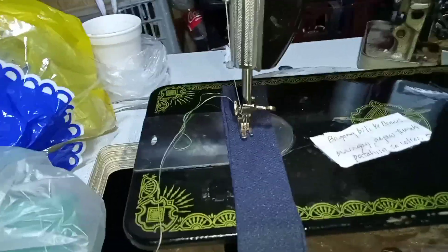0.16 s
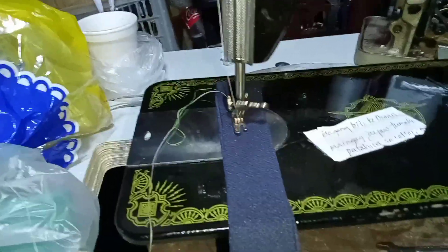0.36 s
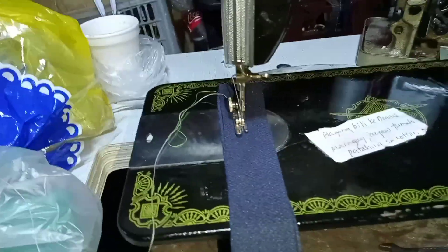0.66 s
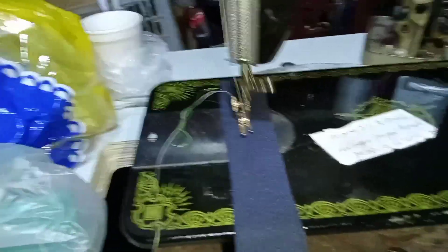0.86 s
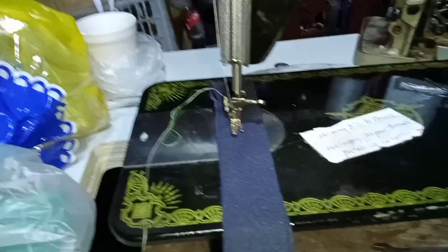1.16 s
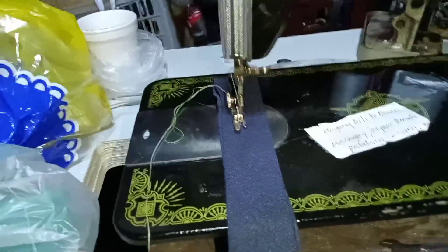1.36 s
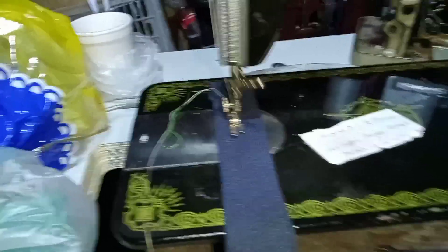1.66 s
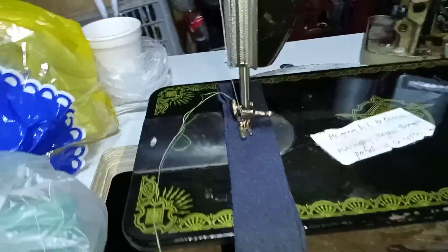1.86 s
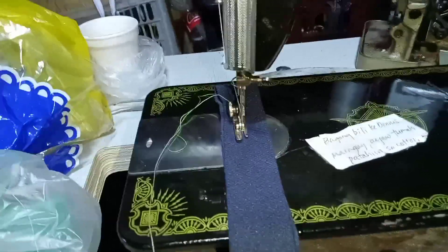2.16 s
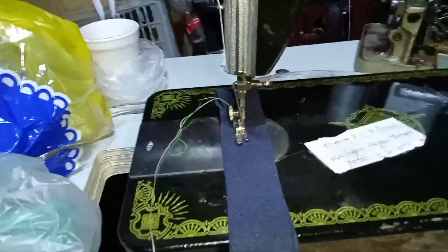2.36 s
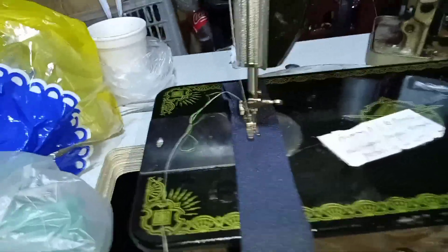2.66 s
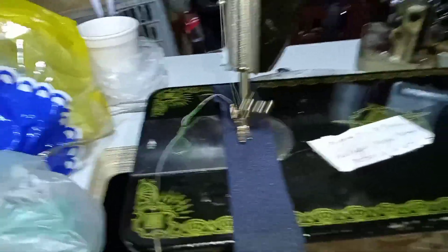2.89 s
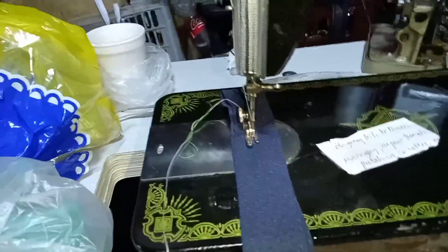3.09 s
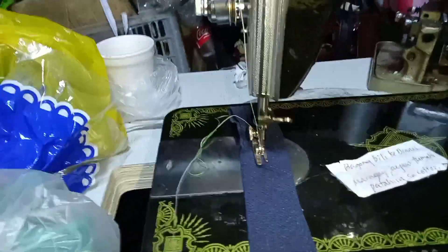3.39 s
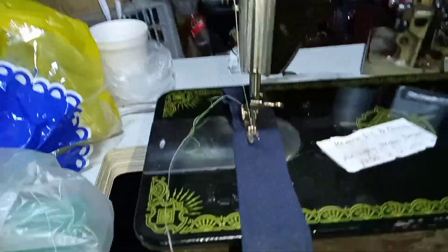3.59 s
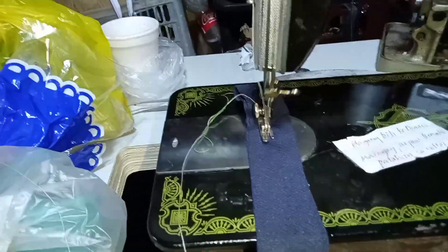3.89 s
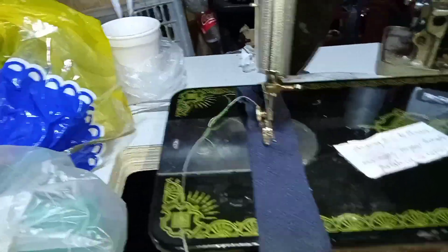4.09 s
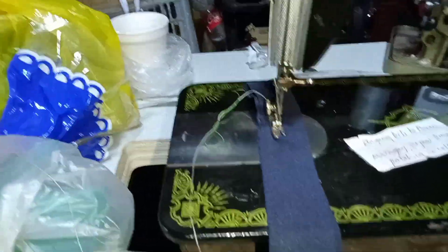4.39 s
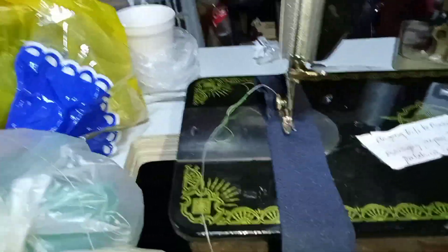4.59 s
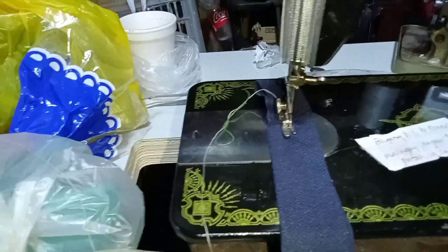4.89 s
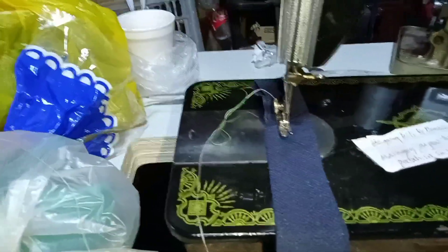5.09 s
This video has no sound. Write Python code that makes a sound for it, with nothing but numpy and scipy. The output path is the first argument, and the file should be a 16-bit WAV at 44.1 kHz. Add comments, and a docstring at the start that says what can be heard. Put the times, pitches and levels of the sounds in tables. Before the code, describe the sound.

Uneven clusters of steel clacks ring a hand-cranked sewing machine in a small workshop, with grating bearings, small rattles and low handling thumps.

```python
"""A cast-iron sewing machine in a small workshop, turned slowly and unevenly by hand, close to a hand-held microphone.
From the start low bumps and a lumpy rumble come from the grip; blows clack in clusters and ring frame, bed and steel.
Bearings rub and cloth hisses throughout; a spring ticks now and then, metal groans in the first three seconds and
a dry pivot squeaks early on. Late on the work drags on the table, and more bumps on the microphone close the scene.
Blows are noise bursts and damped modes; rubbing, rumble and room hush are coloured noise; bumps are short sine pulses."""
import sys
import numpy as np
from scipy import signal
from scipy.fft import rfft, irfft, next_fast_len
from scipy.io import wavfile
from scipy.ndimage import map_coordinates

SR = 44100
rng = np.random.default_rng(int(sys.argv[2]) if len(sys.argv) > 2 else 0)


def unload_audio(sound):
    """Save the sound as a 16-bit wav file, at the path given as the first command line argument."""
    columns = np.transpose(np.atleast_2d(sound))
    # keep every value between -1 and 1, then stretch to whole-number steps
    steps = np.round(np.clip(columns, -1, 1) * 32767)
    wavfile.write(sys.argv[1], SR, steps.astype(np.int16))


N = 231260  # samples


def amp(db):
    """Decibels to gain."""
    return 10 ** (np.asarray(db) / 20)


def unit(x):
    """Scale to rms 1."""
    return x / np.sqrt(np.mean(x ** 2) + 1e-20)


def punch(x):
    """Scale a hit so that its first 10 ms carry rms 1."""
    return x / np.sqrt(np.mean(x[:SR // 100] ** 2) + 1e-20)


def along(points, hz):
    """Read (Hz, value) points on a log frequency axis."""
    f, v = np.transpose(points)
    return np.interp(np.log(hz + 1), np.log(f + 1), v)


def curves(rows):
    """One value per sample for each column after the time."""
    s, *columns = np.transpose(rows)
    return [np.interp(np.arange(N) / SR, s, column) for column in columns]


def wobble(rate):
    """A smooth random curve, rate knots a second."""
    knots = rng.standard_normal(int(N * rate / SR) + 4)
    return map_coordinates(knots, [np.arange(N) * rate / SR])


def swells(rows):
    """A gain that rises and falls around each crest; overlapping swells add in power."""
    power = np.zeros(N + SR)
    for s, half, db in rows:
        first = max(int((s - 3 * half) * SR), 0)
        near = np.arange(first, int((s + 3 * half) * SR))
        gain = amp(db) * np.exp(-((near / SR - s) / half) ** 2)
        power[near] += gain ** 2
    return np.sqrt(power[:N])


def add(track, s, sound):
    """Mix a sound into a track at time s."""
    start = max(round(s * SR), 0)
    track[start:start + len(sound)] += sound[:max(N - start, 0)]


def noise(spectrum):
    """Steady coloured noise of rms 1."""
    size = next_fast_len(N + 8192)
    gain = amp(along(spectrum, np.fft.rfftfreq(size, 1 / SR)))
    coloured = irfft(rfft(rng.standard_normal(size)) * gain, size)
    return unit(coloured[:N])


def body(spectrum, size=2048):
    """The causal (minimum-phase) impulse response of a body with this spectrum."""
    gain = amp(along(spectrum, np.fft.rfftfreq(size, 1 / SR)))
    cepstrum = irfft(np.log(gain))
    # folding the cepstrum forward in time makes the response causal
    cepstrum[1:size // 2] *= 2
    cepstrum[size // 2 + 1:] = 0
    return irfft(np.exp(rfft(cepstrum)))


def struck(spectrum, vary_db, dull_db=0):
    """The body as one blow finds it: each contact favours other resonances, and a soft one loses the very top."""
    hz, db = np.transpose(spectrum)
    top = np.interp(hz, [10000, 13000], [0, 1])
    varied_db = db + vary_db * rng.standard_normal(len(hz)) - dull_db * top
    return body(np.transpose([hz, varied_db]))


RING_T = np.arange(SR // 6) / SR  # time axis of one hit, s


def burst(response, attack, t60, tail_db, tail_t60):
    """A contact: noise with a first decay and a second one at its own level, through a body."""
    decay = amp(-60 * RING_T / t60) + amp(tail_db - 60 * RING_T / tail_t60)
    rattle = decay * (1 - np.exp(-RING_T / attack)) * rng.standard_normal(len(RING_T))
    return punch(signal.fftconvolve(rattle, response)[:len(RING_T)])


def ring(modes, attack, scatter_db, detune):
    """Damped modes; every blow excites and tunes them a little differently."""
    hz, db, t60 = np.transpose(modes)[:, :, None]
    level, shift, phase = rng.standard_normal((3, len(modes), 1))
    waves = np.sin(2 * np.pi * (hz * (1 + detune * shift) * RING_T + phase))
    decay = amp(db + scatter_db * level - 60 * RING_T / t60)
    return punch(np.sum(decay * waves, 0) * (1 - np.exp(-RING_T / attack)))


def glance(edge_db):
    """How glancing a blow is: 1 if dull, 0 if square and bright."""
    return np.interp(edge_db, [-23, -15], [1, 0])


# needle bar, shuttle and feed strike, a cluster for each push on the wheel:
# t/s, blow level/dB, bed knock level/dB re blow, bright edge level/dB re blow (all before the mix trims)
CLACKS = [(.0735, -16.5, -9, -23), (.092, -17, -5.5, -11), (0.1108, -13, -14, -20), (.244, -14, -37, -11.5),
          (0.4084, -21, -10, -14), (.4276, -19, -17, -15), (.4475, -8, -8, -19), (.4574, -9.5, -14, -19),
          (.4652, -18, -11, -7.5), (0.4821, -11, -9.5, -15), (0.5168, -4, -10, -17),
          (0.7876, -21.5, -12, -14), (0.8755, -11.5, -6.5, -25), (0.9576, -9.5, -17, -16.5),
          (.9834, -19, -13, -9.5), (1.0045, -21, 0.5, -13), (1.0336, -14.5, -2, -20),
          (1.222, -14, -12, -21), (1.254, -9.5, -14.5, -19.5), (1.3205, -12, -12.5, -15.5),
          (1.3633, -22.5, -12, -23), (1.381, -24, -30, -24), (1.616, -17.5, -15, -4.5),
          (1.6964, -18.5, -14.5, -20), (1.714, -10, -18.5, -30), (1.7388, -10, -11, -6.5),
          (1.7591, -8.5, -5, -6), (2.024, -12, -7.5, -19), (2.0505, -12.5, -23, -20),
          (2.0793, -10.5, -12, -20), (2.1098, -25, -9.5, -25), (2.139, -24.5, -25, -30),
          (2.2094, -19.5, -18, -18.5), (2.38, -20.5, -5, -27), (2.4459, -20, -31, -13),
          (2.4869, -17, -17, -19), (2.4951, -12.5, -8.5, -20.5), (2.588, -23, -31, -32),
          (2.614, -6, -24, -8), (2.621, -11.5, -19, -12), (2.7395, -16.5, -18, -19.5),
          (2.82, -6, -10, -6.5), (2.8509, -19, -11, -11), (2.8776, -4.5, -19, -16.5),
          (2.887, -11.5, -9, -30), (2.9123, -18.5, -5, -15), (2.917, -4.5, -14, -15),
          (3.2434, -14.5, -5, -9.5), (3.2972, -17, -31, -10), (3.3641, -12, -6, -33),
          (3.3816, -20.5, -8, -19), (3.5743, -13, -24, -13), (3.6461, -23, -4.5, -10),
          (4.0318, -26, -20, -35), (4.082, -18, -18, -41), (4.139, -17, -10.5, -12), (4.6143, -25, -8, -6),
          (4.716, -5, -15.5, -9.5), (4.7878, -10.5, -11, -7.5), (4.8791, -27, 3, -11),
          (5.038, -29, -18, -7)]
# resonances of the hollow bed, the loose steel and the thin needle plate: f/Hz, relative level/dB, t60/s
BED = [(401.5, -0.5, 0.11), (430.3, -2.5, 0.085), (374.7, -8.5, 0.065), (496, -11, 0.065)]
STEEL = [(1806, -12.5, 0.062), (1893, 2, 0.018), (2127, -11.5, 0.055), (2775, -7.5, 0.061),
         (3009, -6.5, 0.041), (3053, -8, 0.063), (3306, -1.5, 0.029), (3608, 1.5, 0.012)]
PLATE = [(5690, -25, 0.11), (7360, -7, 0.06), (8900, -14, 0.058), (9280, -4, 0.019), (10000, -5, 0.028),
         (10800, -18, 0.027)]
# colour of a steel contact and of its bright edge: f/Hz, relative level/dB
CRACK = [(600, -25), (1300, -6), (1850, -4.5), (2350, -1), (3200, -1.5), (3800, -9), (4300, -7),
         (4800, -23), (6000, -21.5), (10000, -75)]
EDGE = [(2500, -51), (4800, -3), (5800, -8), (6700, -2), (7400, -3.5), (8200, 1), (9600, 6), (11000, -7),
        (12300, -7), (13200, -14), (15500, -16)]
FRAME_DB, FRAME_GROWS = -17.5, 0.77  # heavy frame's answer to a 0 dB blow; dB per dB of the blow


def clacks():
    """Steel strikes steel and rings frame, bed and plate; glancing blows are dull, build slowly and graze first."""
    out, crack = np.zeros(N), body(CRACK)
    for s, db, bed_db, edge_db in CLACKS:
        glancing = glance(edge_db)
        rise = .0006 + .0008 * glancing  # s
        lead = rng.uniform(0.0055, 0.008)  # s, the graze starts before the blow
        graze = burst(crack, attack=0.0023, t60=0.055, tail_db=-20, tail_t60=.05)
        add(out, s - lead, glancing * amp(db - 27.5) * graze)

        rattle = burst(struck(CRACK, vary_db=5.0), attack=rise, t60=0.031, tail_db=7, tail_t60=0.05)
        clink = ring(STEEL, attack=rise, scatter_db=4, detune=.015)
        steel = amp(-16.5) * rattle + amp(-13.0) * clink
        bed = amp(-5.0) * ring(BED, attack=.003, scatter_db=2, detune=.022)
        edge = struck(EDGE, vary_db=5.0, dull_db=5 * glancing)
        snap = burst(edge, attack=rise, t60=0.027, tail_db=-17, tail_t60=0.14)
        plate = ring(PLATE, attack=rise, scatter_db=5, detune=0.017)
        bright = amp(-8.5) * snap + amp(-19) * plate

        blow = amp(db) * (steel + amp(bed_db) * bed + amp(edge_db) * bright)
        frame = amp(FRAME_DB + FRAME_GROWS * db) * frame_ring()
        add(out, s, blow + frame)
    return out


# resonances of the cast-iron frame: f/Hz, relative level/dB, t60/s
FRAME = [(676, -12, 0.7), (722, 1.5, 0.06), (765, 0, 0.12), (894, -0.5, 0.099), (1228, -3, 0.14),
         (1345, 8, 0.052)]
# colour of its thud: f/Hz, relative level/dB
THUD = [(60, -21), (130, -2), (300, 3.5), (600, 5.5), (850, 2.5), (1100, -0.5), (1400, -8), (2000, -20),
        (4000, -72)]


def frame_ring():
    """One knock on the cast-iron frame: a noisy thud and its damped modes."""
    cast_iron = ring(FRAME, attack=.003, scatter_db=3.5, detune=.01)
    thud = burst(body(THUD), attack=0.0022, t60=0.045, tail_db=1.0, tail_t60=0.15)
    return amp(-8.5) * thud + amp(-8.5) * cast_iron


# the needle bar hits its stop squarely: t/s, level/dB (before the mix trim)
PINGS = [(.5175, -13), (1.248, -11), (1.759, 0.5), (2.6165, -30), (2.9166, -15), (4.1397, -11),
         (4.7163, -9), (4.788, -16)]
# resonances of the steel rod: f/Hz, relative level/dB, t60/s
NEEDLE_BAR = [(3110, 2, 0.02), (3315, -4, 0.031), (5900, -11, 0.014)]


def needle_bar():
    """A short clear ring of the steel rod, as damped modes."""
    out = np.zeros(N)
    for s, db in PINGS:
        rod = ring(NEEDLE_BAR, attack=.0004, scatter_db=1.5, detune=.012)
        add(out, s, amp(db - 15) * rod)
    return out


def catches(rate, spread_db):
    """Random tiny contacts of uneven size, on average rate a second, ringing the steel; rms 1."""
    landed = rng.random(N) < rate / SR
    sign = np.sign(rng.standard_normal(N))
    contacts = landed * sign * amp(spread_db * rng.random(N))
    scratch = burst(body(CRACK), attack=0.00053, t60=0.012, tail_db=-41, tail_t60=0.011)
    tinkle = ring(STEEL + NEEDLE_BAR, attack=0.0012, scatter_db=2, detune=0.011)
    grit = unit(signal.fftconvolve(contacts, scratch)[:N])
    singing = unit(signal.fftconvolve(contacts, tinkle)[:N])
    return unit(grit + amp(-4.0) * singing)


# how hard the hand drives the wheel: t/s, effort level/dB
EFFORT = [(0, -2.5), (.35, -4), (.45, 0), (1.3, 3), (1.45, -2), (1.68, 0.5), (1.82, -4.5), (2, -4.5),
          (2.15, -2), (2.35, -7.5), (2.7, -5.5), (3.05, -1), (3.35, 3.5), (3.88, -1), (4.1, -9), (4.2, 0.5),
          (4.6, -8), (5.24, -11.5)]
RUB_DB, RUB_GROWS = -39, 0.7  # bearing gain at 0 dB of effort; dB per dB of effort
PLAY_DB, PLAY_LAG_S, PLAY_HALF_S = -29, 0.028, 0.021  # rebounds after a 0 dB blow
CREEP_DB = -58  # stray ticks at 0 dB of effort


def play():
    """Sparse small rebounds in the slack joints after each blow, and stray ticks that follow the effort."""
    effort_db, = curves(EFFORT)
    shaken = swells([(s + PLAY_LAG_S, PLAY_HALF_S, PLAY_DB + db) for s, db, _, _ in CLACKS])
    rebounds = catches(rate=110, spread_db=6)
    strays = catches(rate=28, spread_db=10)
    return shaken * rebounds + amp(CREEP_DB + RUB_GROWS * effort_db) * strays


# separate scrapes of loose parts, short and long: t/s at the crest, half length/s, level/dB (before the mix trims)
SCRAPES = [(.08, 0.018, -33), (.22, 0.024, -31), (.468, 0.027, -25), (.535, 0.072, -32),
           (.815, 0.029, -30.5), (.882, .02, -44), (.948, 0.0095, -25), (.99, 0.036, -29.5),
           (1.705, .015, -34), (2.17, 0.037, -40), (2.455, 0.034, -33.5), (2.515, 0.048, -32.5),
           (3.385, 0.029, -38), (2.607, .008, -47), (2.79, 0.027, -31.5), (3.288, 0.014, -26.5),
           (4.335, 0.018, -33.5)]
GRAZE_DB, GRAZE_HALF_S, GRAZE_LAG_S = -31, 0.019, 0.0062  # the scrape around a square 0 dB blow


def scrapes():
    """Sliding parts catch many times around each blow, more if it glances, and in separate strokes."""
    grazes = [(s + GRAZE_LAG_S, GRAZE_HALF_S, GRAZE_DB + db + 12 * glance(edge_db))
              for s, db, _, edge_db in CLACKS]
    grit = catches(rate=420, spread_db=12)
    gain = np.hypot(swells(SCRAPES), swells(grazes))
    return gain * (amp(-3.0) * grit + amp(-17.0) * noise(EDGE))


# colour of the bearings, and of cloth and thread: f/Hz, relative level/dB
BEARING = [(200, -4), (330, 7), (410, 9), (520, 7.5), (800, -2), (1100, 0.5), (1400, -8.5), (2300, 2),
           (3200, 1), (4000, -1), (5000, -28.5), (8000, -33)]
CLOTH = [(3000, 6.5), (5000, 6.5), (7000, 0), (8500, 6), (9700, 10.5), (11000, 0.5), (12500, -2.5),
         (13500, -8), (15500, -7)]
CLOTH_DB = -48  # hiss at 0 dB of effort, before its flutter
LOAD_DB, LOAD_HALF_S, LOAD_LAG_S = -40, 0.098, 0.01  # extra bearing load, peaking just after a 0 dB blow


def rubbing():
    """Dry bearings grate while cloth and thread hiss; both follow the effort, and each blow loads the bearings."""
    effort_db, = curves(EFFORT)
    load = swells([(s + LOAD_LAG_S, LOAD_HALF_S, LOAD_DB + db) for s, db, _, _ in CLACKS])
    grain = wobble(170)
    grating = amp(-4.0 + 1.9 * grain + 1.0 * wobble(30.1)) * noise(BEARING)
    gritting = amp(-10) * catches(rate=400, spread_db=8)
    bearings = (amp(RUB_DB + RUB_GROWS * effort_db) + load) * (grating + gritting)
    hiss = amp(CLOTH_DB + effort_db + 0.79 * grain) * noise(CLOTH)
    return bearings + hiss


# the thread spring ticks or chatters: t/s, level/dB (before the mix trims), length of the chatter/s
TICKS = [(0.1477, -34, .016), (.526, -26.5, .025), (.5564, -33, 0.0006), (.5705, -25, 0),
         (0.5811, -20.5, 0), (1.7575, -17.5, 0), (2.6173, -28, 0), (4.6143, -23.5, 0), (4.6472, -29, 0),
         (4.7883, -10, 0), (4.8802, -28, 0)]
# resonances of the wire: f/Hz, relative level/dB, t60/s
SPRING = [(3210, 6.5, 0.018), (5740, -5, 0.014), (9420, 0.5, 0.016), (10350, -2.5, 0.015),
          (11700, 3, 0.0079), (12580, -8, .01)]
CHATTER_GAP_S, CHATTER_FADE_DB_PER_S = 0.0048, 80  # from tick to tick; how fast a chatter dies


def spring():
    """Tiny bright ticks of a wire spring, single or in a fading chatter."""
    out, edge = np.zeros(N), body(EDGE)
    for s, db, length in TICKS:
        count = 1 + int(length / CHATTER_GAP_S)
        for delay in CHATTER_GAP_S * np.arange(count):
            wire = ring(SPRING, attack=.0003, scatter_db=2, detune=.012)
            snap = burst(edge, attack=.0003, t60=.014, tail_db=-22, tail_t60=.05)
            tick = amp(-6.5) * wire + amp(-25) * snap
            add(out, s + delay, amp(db - CHATTER_FADE_DB_PER_S * delay) * tick)
    return out


# the shuttle drags: t/s at the crest, half length/s, level/dB (before the mix trim)
GROANS = [(.44, 0.016, -15.5), (0.467, 0.017, -21), (.892, 0.023, -22.5), (0.99, 0.06, -29.5),
          (2.021, 0.01, -15.5), (2.87, 0.031, -16), (2.901, 0.01, -17)]


def groans():
    """Dragging metal makes the bed groan: a wavering tone near its first listed mode swells and dies."""
    pitch_hz = BED[0][0] * (1.02 + 0.047 * wobble(60))
    tone = np.sin(2 * np.pi * np.cumsum(pitch_hz) / SR)
    return amp(-3.3) * swells(GROANS) * tone


# a dry pivot: t/s at the crest, half length/s, level/dB, centre f/Hz
SQUEAKS = [(.757, .012, -52, 14750), (1.066, .012, -44, 11100), (1.175, .009, -54, 14750)]


def squeak():
    """Thin stick-slip whistles, very high: sines of wavering pitch."""
    waver_hz = 40 * wobble(200)
    out = np.zeros(N)
    for s, half, db, hz in SQUEAKS:
        whistle = np.sin(2 * np.pi * np.cumsum(hz + waver_hz) / SR)
        out += swells([(s, half, db)]) * whistle
    return out


# dull knocks of the heavy frame, alone or under a clack: t/s, level/dB (before the mix trims)
FRAME_KNOCKS = [(2.6961, -27), (2.799, -24.5), (2.8886, -24), (4.0719, -28), (4.319, -25.5),
                (4.5464, -21.5), (4.7174, -24.5), (4.789, -21.5)]


def frame_knocks():
    """Dull knocks of the heavy frame, with a little rattle of the loose steel."""
    out = np.zeros(N)
    for s, db in FRAME_KNOCKS:
        shake = burst(body(CRACK), attack=0.00083, t60=0.019, tail_db=-12, tail_t60=0.08)
        add(out, s, amp(db) * (frame_ring() + amp(-14.5) * shake))
    return out


# the work drags on the table: t/s at the crest, half length/s, level/dB (before the mix trims)
SLIDE = [(4.325, 0.012, -31.5), (4.37, 0.038, -33), (4.435, 0.026, -43.5), (4.505, 0.036, -37.5),
         (4.555, 0.039, -37), (4.65, 0.031, -41.5)]
# colour of the table top: f/Hz, relative level/dB
TABLE = [(100, -17.5), (185, -9), (230, 6), (280, -4.5), (330, 0.5), (430, -18), (525, -0.5), (640, -20),
         (820, -11.5), (1600, -29), (4000, -55)]


def table():
    """A dull scrape on the table with a fainter, brighter rustle on top, both swelling noise."""
    return swells(SLIDE) * (amp(4.0) * noise(TABLE) + amp(-5.5) * noise(CRACK))


# the grip shifts on the microphone: start t/s, length/s, rumble level/dB (before the lumps)
GRIPS = [(0, 0.2, -29.5), (0.157, 0.14, -25), (0.422, .19, -28.5), (0.662, 0.14, -28),
         (0.959, 0.094, -26.5), (3.757, 0.096, -33), (4.885, 0.017, -22.5), (5.009, .2, -22.5)]
# bumps on the microphone: t/s, pulse level/dB, f/Hz
BUMPS = [(0.185, -8, 153), (.222, -14, 146), (0.233, -12.5, 210), (0.428, -13.5, 126), (0.673, -12, 147),
         (.689, -12.5, 133), (0.736, -10, 174), (3.764, -25.5, 108), (3.836, -20.5, 100),
         (4.897, -18.5, 167), (5.012, -8, 400), (5.017, -3.5, 261), (5.036, -9, 195), (5.138, -14, 302),
         (5.165, -14, 149), (5.199, -4, 159)]
# colour of the rumble: f/Hz, relative level/dB
RUMBLE = [(20, -23), (45, -19), (70, -3), (100, -2.5), (160, -9), (250, -19), (400, -18.5), (800, -49),
          (2000, -95)]
GRIP_ATTACK_S, GRIP_RELEASE_S = 0.013, 0.025  # time constants of the rumble


def handling():
    """Short low pushes on the microphone, and a lumpy rumble while the grip shifts."""
    t = np.arange(N) / SR
    grips = []
    for s, length, db in GRIPS:
        attack = np.minimum(t - s, 0) / GRIP_ATTACK_S
        release = np.maximum(t - s - length, 0) / GRIP_RELEASE_S
        grips.append(amp(db) * np.exp(attack - release))
    lumps = amp(1.5 * wobble(45))
    out = np.max(grips, axis=0) * lumps * noise(RUMBLE)
    for s, db, hz in BUMPS:
        cycles = (t - s) * hz
        near = np.abs(cycles) < 4
        push = np.sin(2 * np.pi * cycles[near]) / np.cosh(cycles[near] / .42)
        out[near] += amp(db) * push
    return out


# decay of the small room: f/Hz, t60/s
WORKSHOP = [(200, 0.41), (1000, 0.1), (4000, 0.05), (12000, 0.16)]


def workshop(x):
    """The cluttered room answers 5 ms later with a brief noise tail, its low end lasting longest."""
    hz, t, z = signal.stft(rng.standard_normal(SR // 3), SR, nperseg=256)
    decay = amp(-60 * t / along(WORKSHOP, hz)[:, None])
    tail = signal.istft(z * decay, SR, nperseg=256)[1]
    delayed = np.pad(tail / np.linalg.norm(tail), (SR // 200, 0))
    return signal.fftconvolve(x, delayed)[:N]


# colour of the quiet room: f/Hz, relative level/dB
HUSH = [(20, -43), (45, -15), (75, -4.5), (130, 0), (250, -0.5), (450, -4.5), (800, -7.5), (1500, -15),
        (3000, -13.5), (5000, -54), (15000, -43)]


def hush():
    """The steady hush of the workshop, as coloured noise."""
    return amp(-44.5) * noise(HUSH)


def scene():
    """The machine in its room, and the hand on the microphone."""
    blows = clacks() + needle_bar() + play() + scrapes() + frame_knocks()
    machine = blows + spring() + groans() + squeak() + table()
    room = amp(-19.0) * workshop(machine)
    return (machine + room + rubbing() + handling() + hush())[None]


TOP_HZ = 15700  # band limit of the recorder


def record(dry):
    """The recorder thins the deep bass, rounds the highest peaks and cuts steeply above its band limit."""
    thin = signal.sosfilt(signal.butter(2, 50, "high", fs=SR, output="sos"), dry)
    rounded = thin / (1 + np.abs(thin / .9) ** 6) ** (1 / 6)
    return signal.sosfiltfilt(signal.butter(16, TOP_HZ, fs=SR, output="sos"), rounded)


dry = scene()
out = record(dry)
unload_audio(out)
```